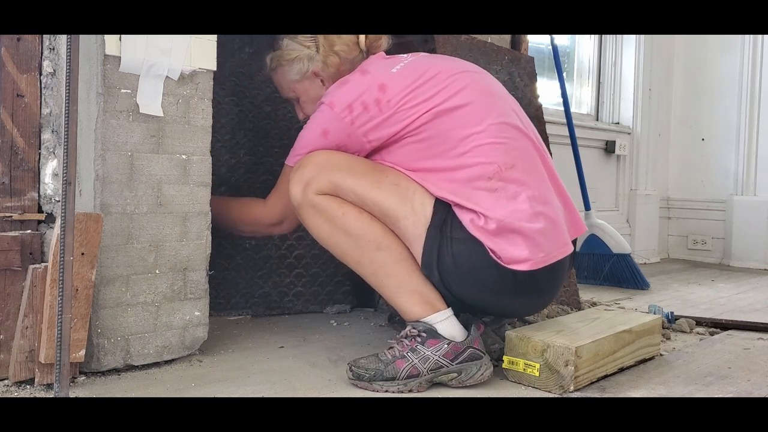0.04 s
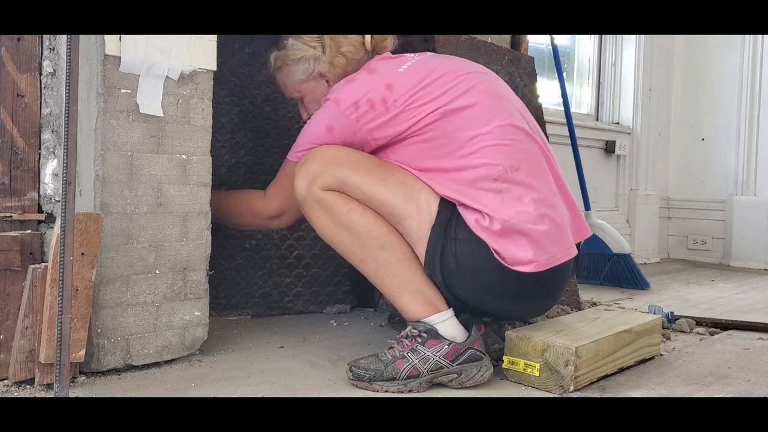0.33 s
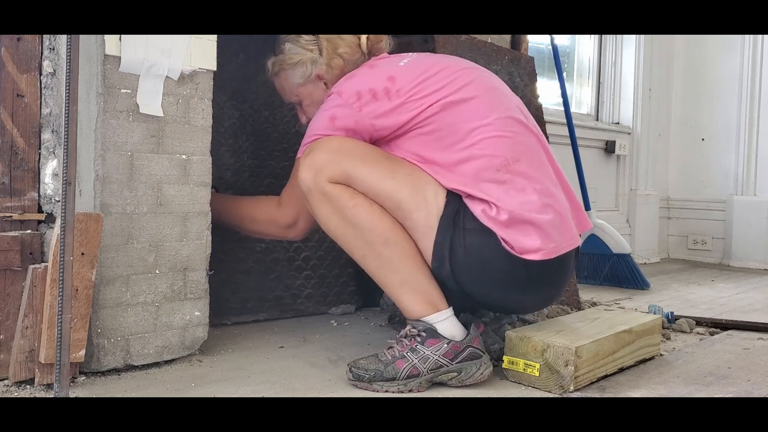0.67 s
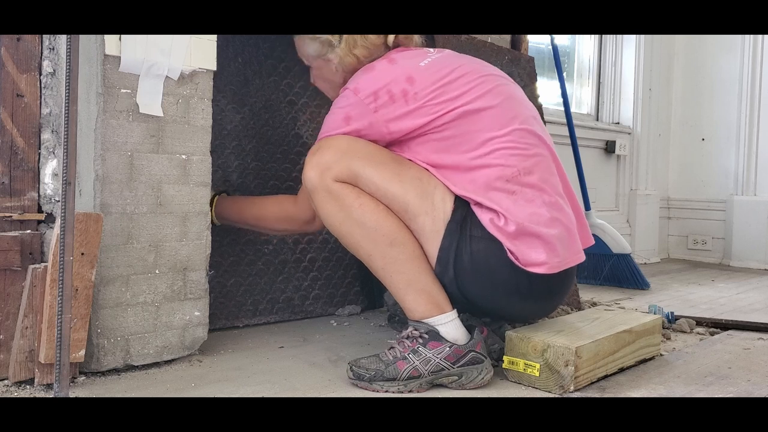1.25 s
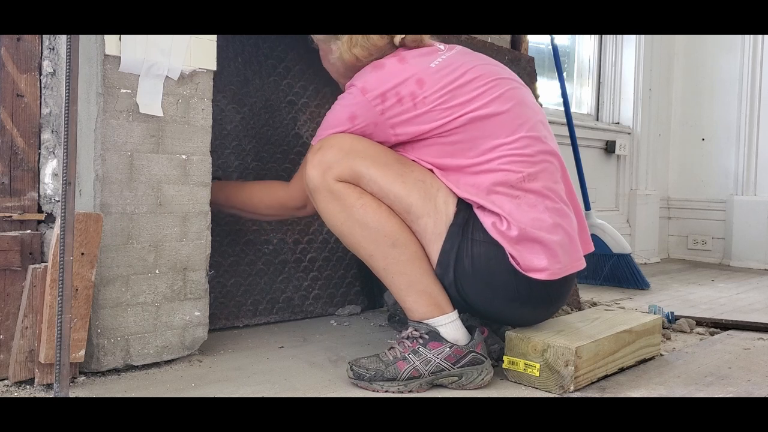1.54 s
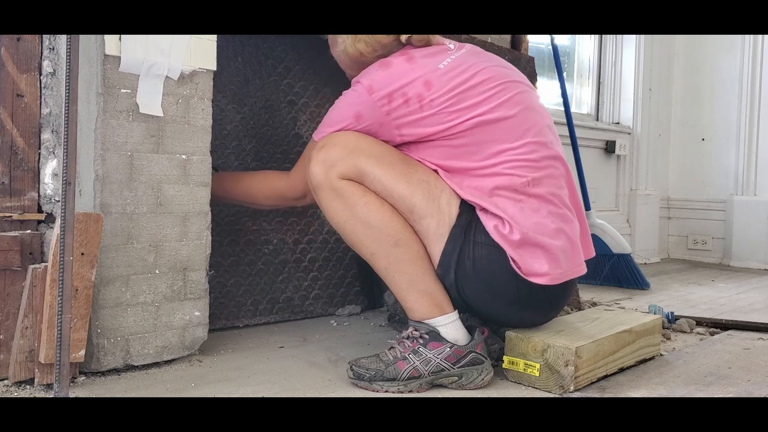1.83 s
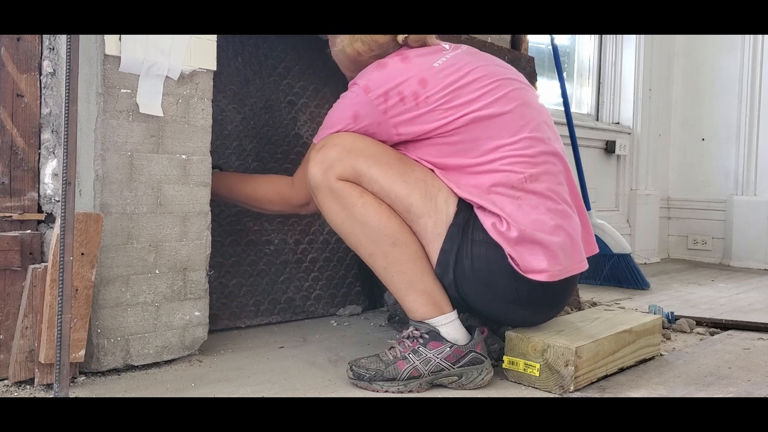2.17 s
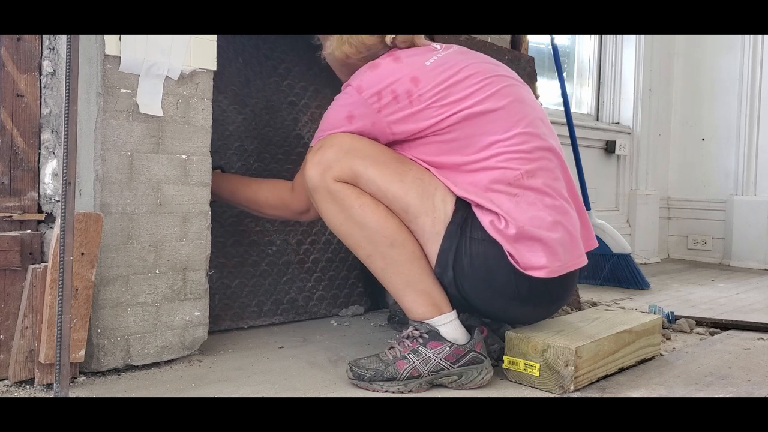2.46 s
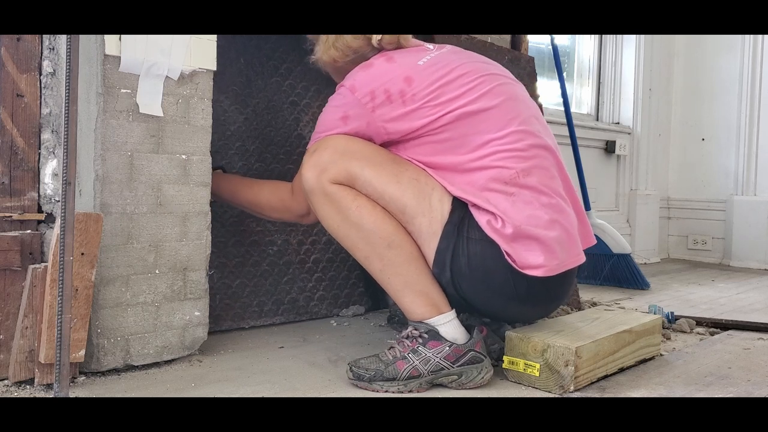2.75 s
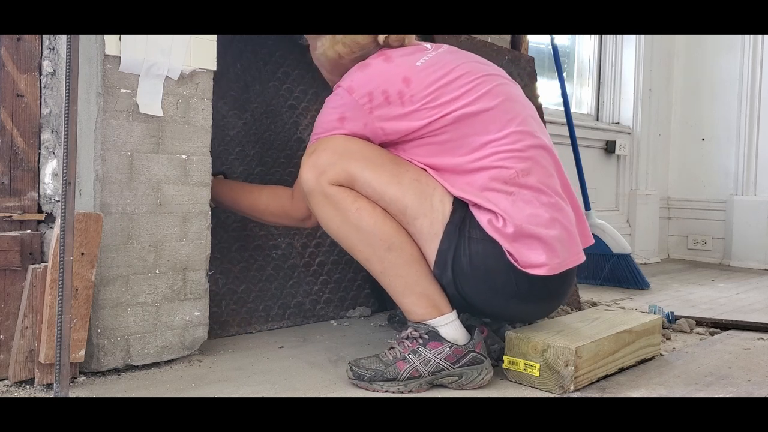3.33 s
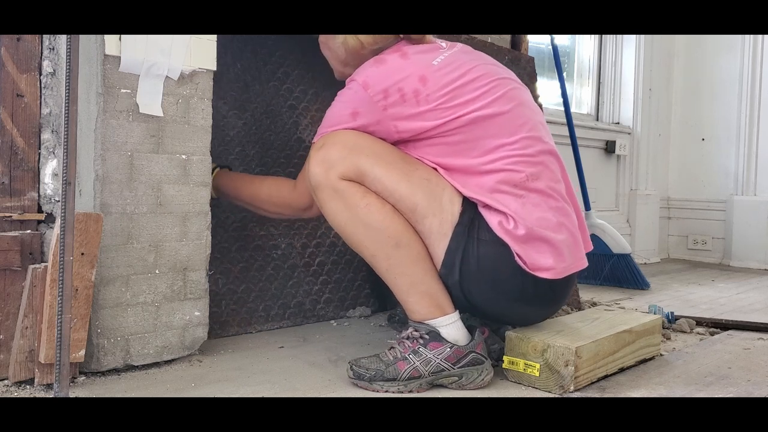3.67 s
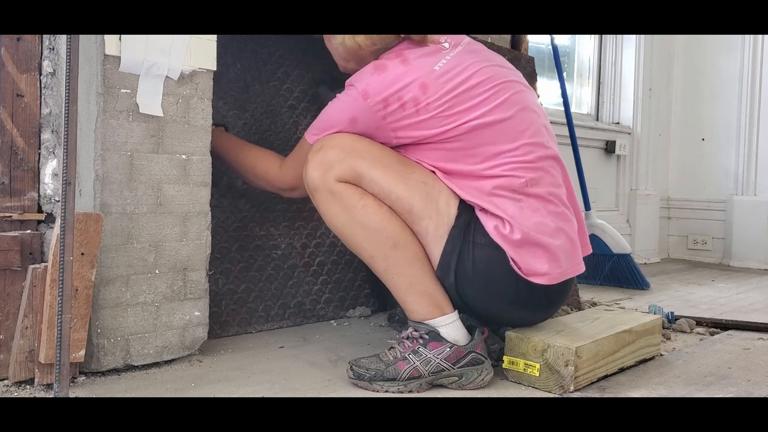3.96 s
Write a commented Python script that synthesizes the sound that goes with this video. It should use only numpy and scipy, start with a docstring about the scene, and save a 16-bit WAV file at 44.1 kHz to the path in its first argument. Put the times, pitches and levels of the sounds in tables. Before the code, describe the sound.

In a bare, echoing room, stones and grit grind across ringing wire mesh just left of the microphone. One short pull settles into faint trickling, then a second brings deep panel booms, sharp snaps and a dull thud.

```python
"""Pulling rubble from behind metal mesh

In a bare room, each pull grinds crumbs, sand and grit over a sheet of metal lath, whose wires ring
with many close tones. Stones scratch and clink, bits snap free, the loose wall panel booms near
100 Hz, and lumps drop dully behind it."""
import sys
import numpy as np
from scipy import signal
from scipy.fft import rfft, irfft, next_fast_len
from scipy.io import wavfile
from scipy.ndimage import map_coordinates

SR = 44100
rng = np.random.default_rng(int(sys.argv[2]) if len(sys.argv) > 2 else 0)


def unload_audio(sound):
    """Save the sound as a 16-bit wav file, at the path given as the first command line argument."""
    columns = np.transpose(np.atleast_2d(sound))
    # keep every value between -1 and 1, then stretch to whole-number steps
    steps = np.round(np.clip(columns, -1, 1) * 32767)
    wavfile.write(sys.argv[1], SR, steps.astype(np.int16))


N = 176400
TIME = np.arange(N) / SR
TOP_HZ = 15850  # the highest pitch kept


def amp(db):
    """Turn decibels into a number to multiply by."""
    return 10 ** (np.asarray(db) / 20)

def unit(x):
    """Scale a signal to an average power of 1."""
    return x / np.sqrt(np.mean(x ** 2) + 1e-20)

def fade(t, fade_s):
    """Die away from t = 0. Every fade time here is the time to fall by 60 dB."""
    return np.exp(-np.log(1000) * np.maximum(t, 0) / fade_s)

def along(points, hz):
    """Read between the rows of a (pitch, value) table, on a musical scale."""
    pitches, values = np.transpose(points)
    return np.interp(np.log(hz + 1), np.log(pitches + 1), values)

def wobble(rate):
    """A smooth curve through `rate` random values a second."""
    return map_coordinates(rng.standard_normal(4096), [TIME * rate], mode='wrap')

def filtered(x, response):
    """Multiply each frequency in x by response(hz)."""
    size = next_fast_len(N + SR // 2)
    return irfft(rfft(x, size) * response(np.fft.rfftfreq(size, 1 / SR)), size)[..., :N]

def coloured(x, tone):
    """Give white noise the tone in a table, keeping its power."""
    return filtered(x, lambda hz: unit(amp(along(tone, hz))))

def convolved(x, response):
    """Let every sample of x set off a left and a right response, each scaled to energy 1."""
    response = response / np.linalg.norm(response, axis=1, keepdims=True)
    return signal.fftconvolve(np.atleast_2d(x), response, axes=1)[:, :N]

def grains(rate, spread_db=4.5):
    """Tiny clicks of random size, about `rate` a second."""
    hits = rng.random(N) < rate / SR
    signs = np.sign(rng.standard_normal(N))
    sizes = amp(spread_db * np.clip(rng.standard_normal(N), -2, 2))
    return unit(hits * signs * sizes)

def bursts(times, levels_db, fade_s):
    """Sudden puffs of noise that die away."""
    strength = sum(amp(db) * (TIME >= s) * fade(TIME - s, fade_s) for s, db in zip(times, levels_db))
    return strength * rng.standard_normal(N)

def ringing(hz, db, fade_s):
    """One second of fading tones, with random phases left and right."""
    spectrum = np.zeros((2, SR // 2 + 1), complex)
    bins = np.clip(np.round(hz).astype(int), 1, SR // 2)
    spectrum[:, bins] = amp(db) * np.exp(2j * np.pi * rng.random((2, len(hz))))
    return irfft(spectrum) * fade(np.arange(SR) / SR, fade_s)


# tone of the room's air and of settling rubble (pitch [Hz], level [dB])
AIR_TONE = [(15, -37), (28, 1), (260, -11), (523, -18), (1270, -17), (3500, -31.5), (8000, -47.5),
            (15500, -44)]
SETTLING_TONE = [(300, -0.5), (4000, -7.5), (7000, -21.5), (15000, -23)]

def background():
    """Quiet room air, and the fading hiss of rubble that has just settled."""
    air = coloured(rng.standard_normal((2, N)) + rng.standard_normal(N), AIR_TONE)
    settling = coloured(rng.standard_normal((2, N)), SETTLING_TONE) * fade(TIME, fade_s=1.36)
    return amp(-54.5) * unit(air) + amp(-54) * settling


# stone edges catching (time [s], pitch [Hz], level [dB], fade time [s])
SCRATCHES = [(0.144, 11800, -50.5, 0.059), (0.644, 13740, -24.5, 0.11), (2.796, 2070, -37, 0.11),
             (3.476, 1750, -45.5, .45)]

def scratches(sharpness=8.7):
    """A stone's edge catches and rasps: fast clicks ring broadly around one pitch."""
    out = np.zeros(N)
    for start, pitch, db, fade_s in SCRATCHES:
        rasp = filtered(grains(rate=1500), lambda hz: 1 / (1 + 1j * sharpness * (hz / pitch - 1)) ** 2)
        out += amp(db) * unit(rasp) * (TIME >= start) * fade(TIME - start, fade_s)
    return out


# the mesh's strongest tones (pitch [Hz], level in first grip [dB], level in second grip [dB])
MESH_TONES = [(796.7, -50, -62), (1137, -42, -51), (1354, -45, -59), (1458, -57, -45), (1588, -46, -57),
              (1812, -54, -45), (2215, -44, -50), (2870, -57, -49), (3045, -48, -49), (3339, -47, -56),
              (3516, -47, -51), (4002, -44, -56), (4222, -53, -45), (4493, -44, -53)]

def mesh_ring(contact, shift_s=.55, let_go_s=1.8, regrip_s=2.85):
    """Rubble sets the mesh ringing as it moves from wire to wire; each grip has its own strong tones."""
    ring, count = np.zeros((2, N)), 440
    for middle in np.arange(0, N / SR + shift_s, shift_s):  # a fresh set of weak tones at each shift
        wire_hz = 1000 + (TOP_HZ - 1000) * (np.arange(count) + rng.random(count)) / count
        wires = ringing(wire_hz, db=4 * rng.standard_normal((2, count)), fade_s=.56)
        touch = np.sqrt(np.maximum(1 - abs(TIME - middle) / shift_s, 0))
        ring += amp(-2.5) * convolved(contact * touch, wires)
    hz, first_db, second_db = np.transpose(MESH_TONES)
    for db, held in (first_db, TIME < let_go_s), (second_db, TIME >= regrip_s):
        ring += amp(-12) * convolved(contact * held, ringing(hz, db, fade_s=.62))
    return ring


# pulls (time [s], rise [s], hold [s], crumbs [dB], sand [dB], grit [dB], rumble [dB])
PULLS = [(0.301, 0.042, 0.07, -53.5, -59, -41, -49.5), (0.383, 0.018, 0.013, -35, -32.5, -26.5, -38.5),
         (0.416, 0.011, 0.013, -33, -28.5, -22, -32.5), (0.45, 0.003, 0.045, -35, -31.5, -56, -34.5),
         (0.507, 0.0084, 0.1, -28, -29.5, -38.5, -31.5), (0.634, 0.004, 0.095, -36.5, -35.5, -33.5, -38),
         (0.759, 0.009, 0.012, -29.5, -31.5, -48, -32), (0.84, 0.024, 0.094, -40, -38.5, -48, -40),
         (2.047, 0.032, 0.045, -49.5, -45, -56, -48), (2.122, 0.0045, 0.077, -43.5, -44, -49.5, -46.5),
         (2.179, .02, 0.12, -51.5, -51.5, -57.5, -35.5), (2.355, 0.024, 0.034, -39.5, -34.5, -43.5, -38.5),
         (2.399, .02, 0.082, -36.5, -32, -40.5, -30), (2.513, 0.0024, 0.086, -42.5, -42.5, -52.5, -38),
         (2.775, 0.011, 0.045, -38, -51, -53, -40), (2.853, 0.023, 0.075, -42.5, -39, -47.5, -37),
         (2.942, .002, 0.036, -29.5, -41, -38.5, -27), (2.97, 0.012, 0.064, -32, -27.5, -36.5, -32.5),
         (3.076, 0.0013, 0.023, -31, -25, -39.5, -32), (3.154, 0.023, 0.027, -41.5, -37.5, -66.5, -39.5),
         (3.324, 0.019, 0.29, -54, -64.5, -74, -55.5)]
# dust trickling between pulls (time [s], hold [s], crumbs and sand [dB], grit [dB])
TRICKLES = [(1.488, .1, -66.5, -70.5), (2.005, 0.056, -62, -69.5), (3.92, 0.088, -63, -89)]

def pulling(fade_s=.11, rumble_fade_s=.34):
    """How strong crumbs, sand, grit and rumble are as each pull rises, holds and dies away."""
    power = np.zeros((4, N))
    fade_times = np.array([[fade_s], [fade_s], [fade_s], [rumble_fade_s]])
    for start, rise, hold, *levels_db in PULLS:
        shape = np.clip((TIME - start) / rise, 0, 1) * fade(TIME - start - rise - hold, fade_times)
        power += (amp(levels_db)[:, None] * shape) ** 2
    for start, hold, coarse_db, grit_db in TRICKLES:
        shape = (TIME > start) * fade(TIME - start - hold, fade_s)
        power[:3] += (amp([coarse_db, coarse_db, grit_db])[:, None] * shape) ** 2
    return np.sqrt(power)


# tone of each size of rubble on the mesh (pitch [Hz], level [dB])
CRUMB_TONE = [(150, -37.5), (500, -1.5), (1400, -4), (2200, 0), (3000, -5.5), (4500, -18.5), (9000, -35)]
SAND_TONE = [(1500, -17.5), (2600, 5), (3500, 5.5), (4400, 3), (5700, 0), (7200, -8.5), (9000, -15.5),
             (14000, -40)]
GRIT_TONE = [(1500, -14), (5000, -6.5), (7600, -9.5), (9500, -2), (14000, -2.5), (16000, -10.5)]

def scraping(crumbs, sand, grit):
    """Crumbs, sand and grit judder over the mesh together, each in its own clumps, and snap off it."""
    judder = amp(1.3 * wobble(rate=130))
    layers = (crumbs, 1700, CRUMB_TONE), (sand, 1700, SAND_TONE), (grit, 1500, GRIT_TONE)
    out = np.zeros(N)
    for (strength, clicks_per_s, tone), snap in zip(layers, snaps()):
        clumps = amp(1.5 * wobble(rate=40))
        out += coloured(strength * judder * clumps * grains(clicks_per_s) + snap, tone)
    return out


def pebbles(strength, per_s=130, low_hz=1500, high_hz=6500, ring_cycles=150):
    """Small stones clink briefly as they tumble, each at its own pitch."""
    t, out = np.arange(SR // 10) / SR, np.zeros(N + SR)
    for when, pitch, size in rng.random((int(per_s * N / SR), 3)):
        hz = low_hz * (high_hz / low_hz) ** pitch
        start = int(when * N)
        out[start:start + len(t)] += size ** 2 * fade(t, ring_cycles / hz) * np.sin(2 * np.pi * hz * t)
    return amp(-9) * strength * unit(out[:N])


# deep tone of a pull (pitch [Hz], level [dB])
RUMBLE_TONE = [(22, -33), (52, 1.5), (80, 4.5), (130, -2.5), (270, -7), (400, -15.5), (650, -20.5),
               (1500, -75)]

def rumble(strength):
    """The many small knocks of a pull blur into a low rumble."""
    return coloured(strength * grains(rate=1500), RUMBLE_TONE)


# bits snapping free (time [s], coarse level [dB], fine level [dB])
SNAPS = [(0.396, -23.5, -23), (.52, -20.5, -18), (0.768, -37.5, -25.5), (1.257, -39, -50.5),
         (2.13, -28, -46.5), (2.381, -29.5, -42), (2.617, -34.5, -40.5), (2.757, -31.5, -38.5),
         (2.95, -20, -24.5), (3.076, -17, -18)]

def snaps(fade_s=.035):
    """Bits break free in short puffs of noise: one signal each for crumbs, sand and grit."""
    times, coarse_db, fine_db = np.transpose(SNAPS)
    crumbs = .5 * bursts(times, coarse_db, fade_s)
    return crumbs, bursts(times, coarse_db, fade_s), bursts(times, fine_db, fade_s)


# plucked wires (time [s], pitch [Hz], level [dB])
TWANGS = [(.53, 1137, -32), (.58, 2215, -34), (2.99, 1812, -30)]

def twangs(rise_s=.015, fade_s=.95):
    """A passing stone plucks a single wire, which rings on."""
    out = np.zeros((2, N))
    for start, hz, db in TWANGS:
        age = np.maximum(TIME - start, 0)
        phase = 2 * np.pi * hz * age + np.pi * rng.random((2, 1)) / 2  # differs left and right
        out += amp(db) * (1 - np.exp(-age / rise_s)) * fade(age, fade_s) * np.sin(phase)
    return out


# swells of the wall panel's boom (peak time [s], level [dB], half-width [s])
SWELLS = [(0.814, -26, 0.013), (0.967, -35, 0.059), (2.142, -31.5, 0.02), (2.265, -20, 0.048),
          (2.45, -26, 0.072), (2.865, -38.5, 0.063), (3.2, -34, 0.03)]

def panel_boom(hz=100):
    """The loose panel swings at its lowest, slightly wavering note as the mesh drags on it."""
    power = np.zeros(N)
    for peak, db, width in SWELLS:
        power += (amp(db) / np.cosh(np.clip((TIME - peak) / width, -20, 20))) ** 2  # a bell shape
    return np.sqrt(power) * unit(np.sin(2 * np.pi * hz * TIME + .2 * wobble(rate=36)))


# falling lumps (time [s], level [dB])
LUMPS = [(1.627, -48), (1.645, -43.5), (1.68, -51), (1.713, -46.5), (1.79, -47.5), (3.078, -27),
         (3.923, -45.5)]
# tone of their thuds (pitch [Hz], level [dB])
THUD_TONE = [(25, -19), (65, -4.5), (300, -15), (500, -17), (800, -32.5), (6000, -59)]

def lumps():
    """Lumps drop behind the wall and land with dull thuds."""
    return coloured(bursts(*np.transpose(LUMPS), fade_s=.27), THUD_TONE)


# the panel's own notes (pitch [Hz], level [dB], fade time [s])
PANEL_NOTES = [(97.3, -2, 0.42), (182.3, -14.5, 0.3), (250.6, -15, 0.29)]

def panel_jolt(start_s=2.949, rise_s=.0026):
    """The panel springs back once and its low notes ring out."""
    age = np.maximum(TIME - start_s, 0)
    notes = sum(amp(db) * fade(age, fade_s) * np.sin(2 * np.pi * hz * age)
                for hz, db, fade_s in PANEL_NOTES)
    return amp(-9) * (1 - np.exp(-age / rise_s)) * notes


def close_echoes(x):
    """Quick, scattered echoes off the floor and wall beside the mesh."""
    t = np.arange(SR // 10) / SR
    return convolved(x, rng.standard_normal((2, len(t))) * fade(t, fade_s=.045))


# how long the room rings (pitch [Hz], fade time [s])
ROOM_FADES = [(100, 0.34), (500, 1.79), (1500, 1.56), (4000, 1.32), (12000, 0.83)]

def room(x):
    """Echoes off the bare walls blur into a long tail, different left and right."""
    hz, t, noise = signal.stft(rng.standard_normal((2, SR + SR // 2)), SR, nperseg=256)
    tail = signal.istft(noise * fade(t, along(ROOM_FADES, hz)[:, None]), SR, nperseg=256)[1]
    return convolved(x, tail)


# how much louder the left side is than the right (pitch [Hz], level gap [dB])
LEFT_BOOST = [(60, 0.3), (500, 4.2), (1000, 6.7), (5000, 8.5), (8000, 3.8), (11000, 2.5), (13000, 11.7),
              (15000, 15.6)]

def scene(left_lead_s=.00009):
    """Mesh, panel and lumps are left of the microphone, so that side hears them sooner and louder."""
    crumbs, sand, grit, rumble_strength = pulling()
    contact = scraping(crumbs, sand, grit) + pebbles(np.hypot(crumbs, sand)) + scratches()
    low = rumble(rumble_strength) + lumps()
    direct = amp(-5.5) * contact + low + panel_boom() + panel_jolt()
    sides = np.array([[.5], [-.5]])  # left, right
    near = filtered(direct, lambda hz: np.exp(2j * np.pi * hz * left_lead_s * sides))
    echoes = amp(-6.5) * close_echoes(contact) + amp(-8.5) * room(contact) + amp(-4.5) * room(low)
    sound = near + mesh_ring(contact) + twangs() + echoes + background()
    side_gain = lambda hz: amp(sides * along(LEFT_BOOST, hz))
    return filtered(sound, lambda hz: side_gain(hz) / side_gain(hz).mean(axis=0))


def record(dry):
    """Cut away the very highest treble."""
    return filtered(dry, lambda hz: hz < TOP_HZ)


dry = scene()
out = record(dry)
unload_audio(out)
```